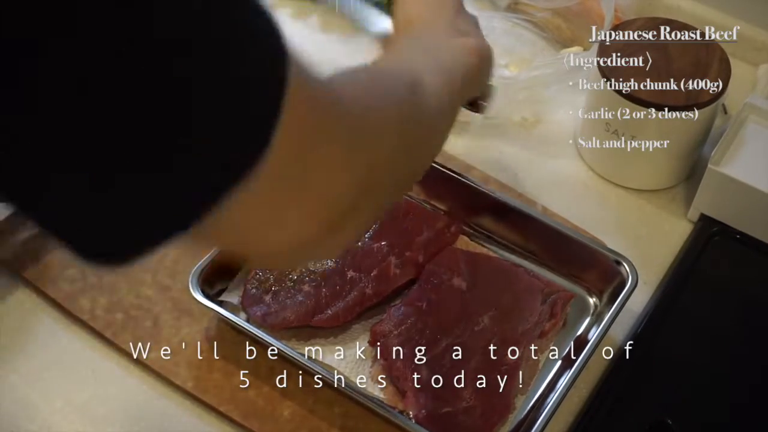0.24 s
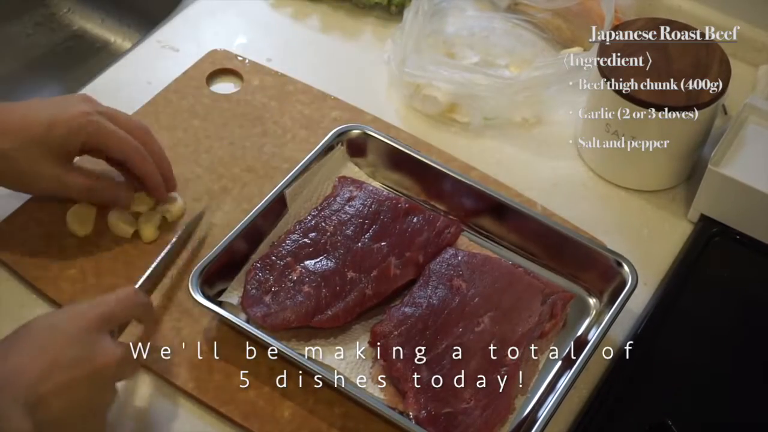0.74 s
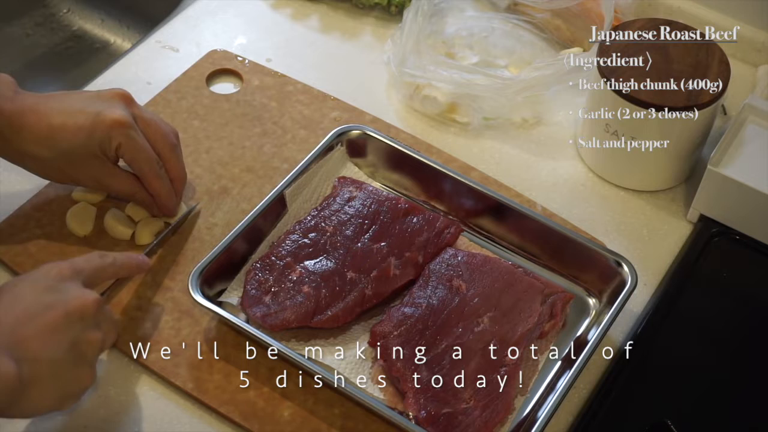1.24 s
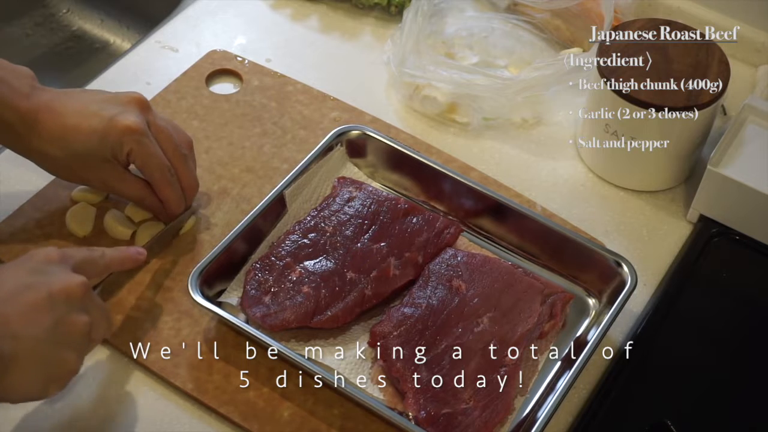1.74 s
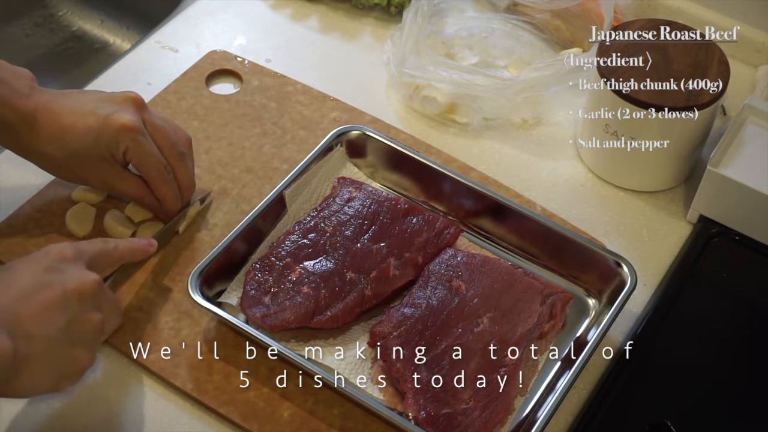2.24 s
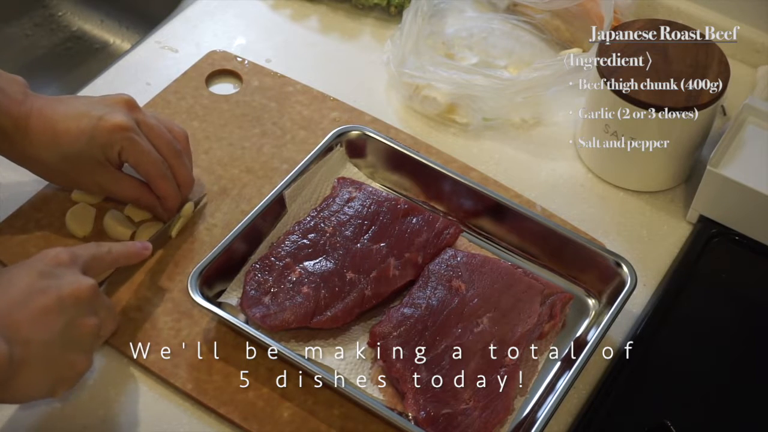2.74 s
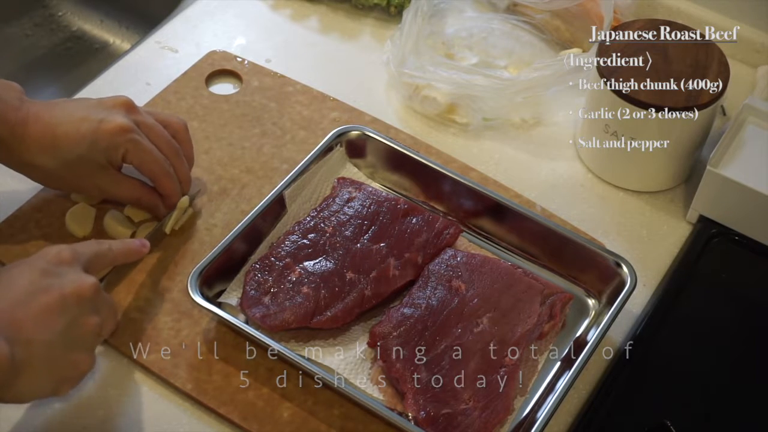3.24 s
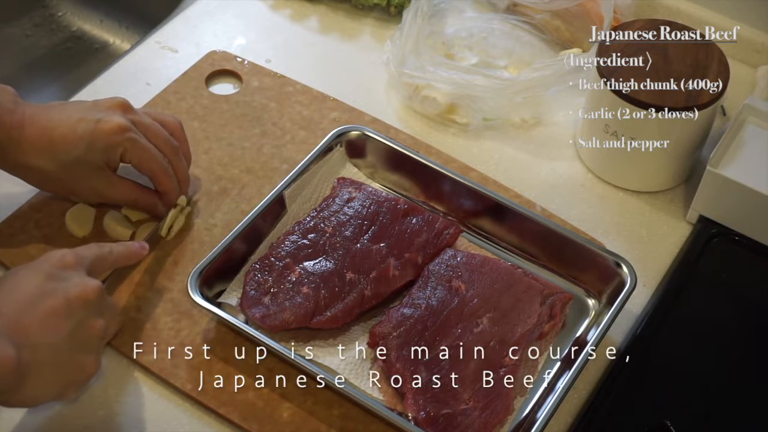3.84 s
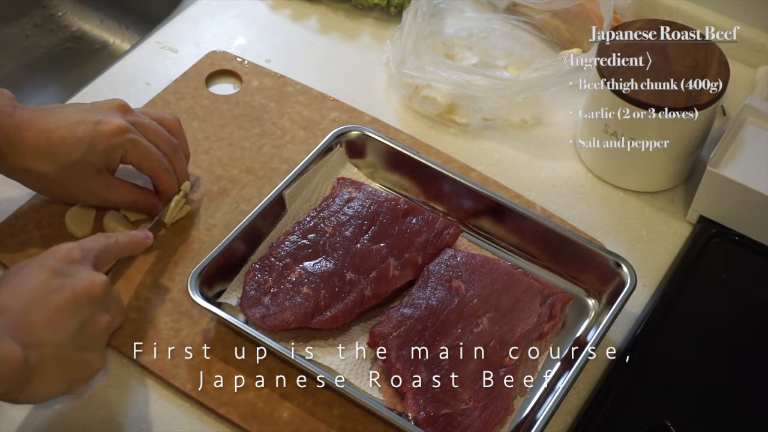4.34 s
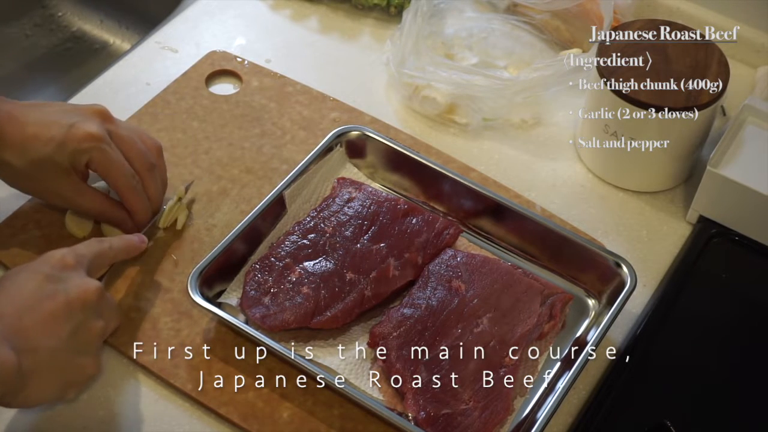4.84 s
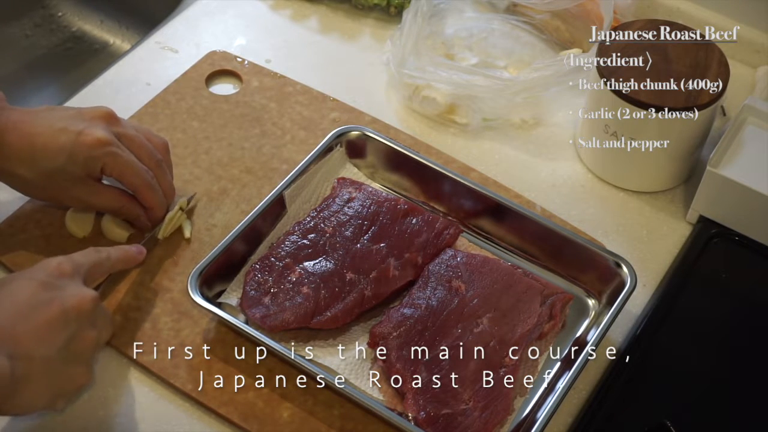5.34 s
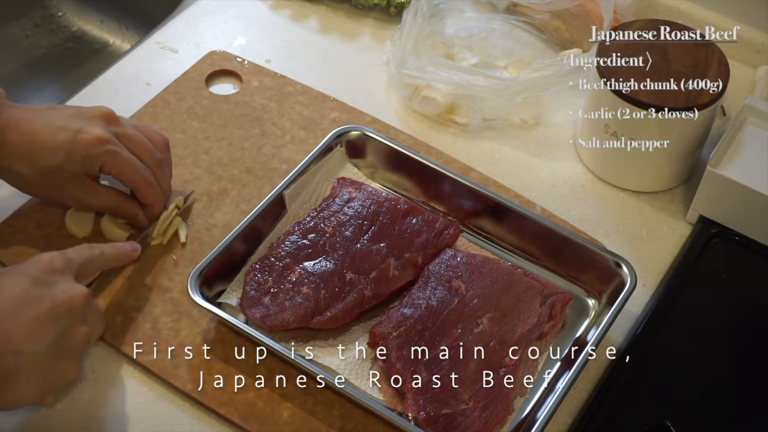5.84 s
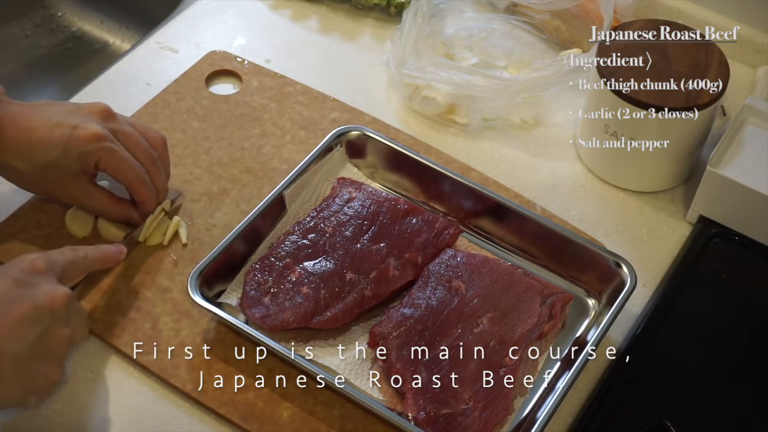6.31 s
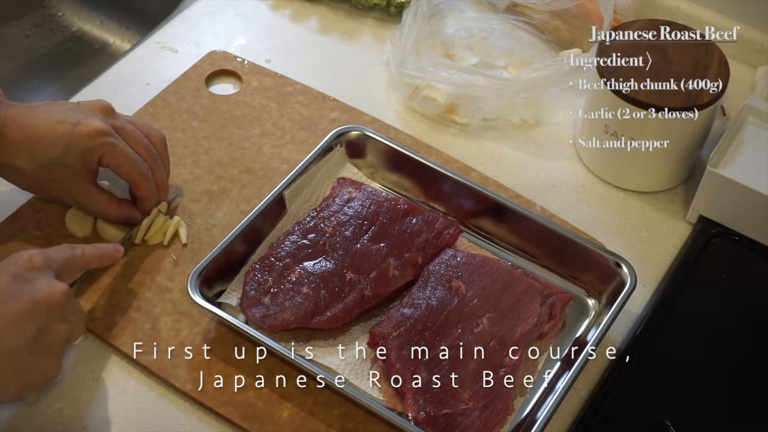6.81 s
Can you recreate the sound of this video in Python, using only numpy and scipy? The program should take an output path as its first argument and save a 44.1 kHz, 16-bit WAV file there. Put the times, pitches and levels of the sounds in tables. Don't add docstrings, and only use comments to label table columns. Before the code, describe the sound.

A quiet, bare kitchen with hard, short echo, heard in stereo from a step away. At 0 s there are dull handling bumps and low counter rumble; at 0.15 s the knife lifts with a thin steel clink, quickly damped. Faint rustling and a tiny tick come near 0.7 s, then a firm set-down knock at 0.9 s and a gritty, stuttering blade drag around 1.1 s, leaving a brief metallic singing. From 1.8 s, garlic is sliced: a tiny crisp crunch, then a dry woody knock, at 1.8, 2.2, 2.5 (soft), 2.7, 3.1, 3.35, 3.9 (faint), 4.2 and 4.5 s. A lull follows with light finger rustles and a small crunch at 5.3 s. Knocks resume at 5.6, 6.1, 6.35, 6.6 and 6.9 s. Between 6.37 and 6.6 s, a wet-blade squeak slides down and jumps lower. Soft rumble and room hum continue throughout.

```python
import sys
import numpy as np
from scipy import signal
from scipy.fft import rfft, irfft, next_fast_len
from scipy.io import wavfile
from scipy.ndimage import uniform_filter1d

SR = 44100
rng = np.random.default_rng(int(sys.argv[2]) if len(sys.argv) > 2 else 0)


def convert_level_to_amplitude(level_db):
    exponent = np.asarray(level_db, float) / 20
    return 10 ** exponent


def to_wav(sig):
    pcm = np.clip(np.atleast_2d(sig), -1, 1) * 32767
    pcm = np.round(pcm).astype(np.int16)
    wavfile.write(sys.argv[1], SR, pcm.T)


N = 311787

# centre in Hz, width in Hz, level in dB.
COUNTER_DIP = [(2036, 220, -10)]


def unit(x):
    return x / np.sqrt(np.mean(x ** 2) + 1e-20)


def along(points, hz):
    f, v = np.transpose(points)
    return np.interp(np.log(hz + 1), np.log(f + 1), v)


def stroke(rows):
    s, *cols = np.transpose(sorted(map(tuple, rows)))
    at = np.arange(max(round(s[0] * SR), 0), min(round(s[-1] * SR), N))
    return at, [np.interp(at / SR, s, c) for c in cols]


def swell(peak_s, db, rise_s, fall_s):
    start = (peak_s - 2 * rise_s, db - 40)
    end = (peak_s + 2 * fall_s, db - 40)
    at, (level_db,) = stroke([start, (peak_s, db), end])
    return at, convert_level_to_amplitude(level_db)


def filtered(x, response):
    m = next_fast_len(x.shape[-1] + 8192)
    return irfft(rfft(x, m) * response(np.fft.rfftfreq(m, 1 / SR)), m)[..., :x.shape[-1]]


def resonances(modes, f):
    total = 0
    for k, (centre, width, db) in enumerate(modes):
        damping = 1j * f * width
        total = total + (-1) ** k * convert_level_to_amplitude(db) * damping / (centre * centre - f * f + damping)
    return total


def ring(modes, f):
    return resonances([(hz, w, db + 1.6 * rng.standard_normal()) for hz, w, db in modes], f)


def grainy(spectrum, spike_db):
    sizes = np.repeat(convert_level_to_amplitude(spike_db * rng.standard_normal(N // 32 + 1)), 32)[:N]
    return unit(filtered(sizes * rng.standard_normal(N), lambda hz: convert_level_to_amplitude(along(spectrum, hz))))


def spread(pair):
    # frequency in Hz, side minus mid in dB.
    side_over_mid = [(60, -36), (110, -11), (200, -8.5), (380, -11), (700, -7.5), (1290, -5), (2380, -2.5),
                     (4400, 0), (8120, 1.5), (15000, 1)]

    def mid_side(hz):
        ratio = convert_level_to_amplitude(along(side_over_mid, hz))
        return np.array([1 + 0 * hz, ratio]) / np.hypot(1, ratio)

    mid, side = filtered(pair, mid_side)
    return np.array([mid + side, mid - side])


def kitchen(walls, t60, direct_db, early_db):
    # frequency in Hz, echo length as a ratio to that near 1 kHz.
    echo_ratio = [(200, 0.79), (1000, 0.96), (4000, 1.09), (8000, 0.96), (15000, 0.48)]
    noise = 0.88 * walls + 0.76 * rng.standard_normal(walls.shape)
    hz, t, z = signal.stft(noise, SR, nperseg=128)
    band_t60 = np.clip(t60, .1, 1.5) * along(echo_ratio, hz)[:, None]
    tail = signal.istft(z * convert_level_to_amplitude(-60 * t / band_t60), SR, nperseg=128)[1]
    t = np.arange(tail.shape[1]) / SR
    early = convert_level_to_amplitude(early_db - 60 * t / 0.018)
    tail = spread(tail * (1 + early) * np.clip(t / 0.000067, 0, 1))
    tail[:, 0] += convert_level_to_amplitude(direct_db)
    return tail


def room_tone():
    # frequency in Hz, level in dB per Hz.
    air_colour = [(12, -62), (20, -10), (75, -32), (108, -2.5), (147, -21.5), (230, -6), (297, -10.5),
                  (382, -7), (670, -19.5), (2010, -23), (2890, -26.5), (5210, -28), (5830, -28.5),
                  (15200, -26.5), (16500, -49)]
    air = filtered(spread(rng.standard_normal((2, N))), lambda hz: convert_level_to_amplitude(along(air_colour, hz)))
    return convert_level_to_amplitude(-52.5) * unit(air)


def counter_rumble():
    # peak in seconds, rumble level in dB.
    pushes = [(.03, -42), (.75, -70), (.94, -54), (1.26, -54.5), (1.63, -54.5), (1.89, -53), (2.13, -52.5),
              (2.24, -52), (2.5, -54), (2.75, -53), (2.97, -52), (3.09, -51.5), (3.31, -48.5), (3.419, -51),
              (3.62, -45), (3.78, -59), (3.93, -47), (4.21, -45), (4.51, -52.5), (4.61, -58), (5.36, -59),
              (5.56, -49.5), (5.68, -55), (5.81, -48.5), (6.08, -48), (6.4, -50.5), (6.58, -49),
              (6.72, -49), (6.92, -46)]
    # centre in Hz, width in Hz, level in dB.
    counter_modes = [(26.2, 5.1, 1), (58, 14.7, 2), (82.2, 14.6, 2.5), (149, 61, -3)]
    power = np.full(N, convert_level_to_amplitude(-67) ** 2)
    for s, db in pushes:
        at, gain = swell(s, db, rise_s=0.1, fall_s=0.17)
        power[at] += gain ** 2
    rumble = unit(filtered(rng.standard_normal(N), lambda hz: resonances(counter_modes, hz) ** 2))
    return convert_level_to_amplitude(4.0) * np.sqrt(power) * rumble


def clink():
    # frequency in Hz, level in dB, time to fall 60 dB in seconds.
    steel_modes = [(2480, -42, 0.25), (2564, -37.5, 0.1), (3408, -44.5, 0.57), (3740, -61, .1),
                   (4180, -46, 0.13), (4430, -56, .12), (5870, -49, .1), (7830, -50, 0.11),
                   (12300, -49, .1), (13560, -38, 0.17)]
    out, t = np.zeros(N), np.arange(SR // 2) / SR
    steel = sum(convert_level_to_amplitude(db - 60 * t / t60) * np.sin(2 * np.pi * hz * t) for hz, db, t60 in steel_modes)
    steel *= np.clip((.18 - t) / 0.053, 0, 1)
    scuff = convert_level_to_amplitude(-34.0 - 60 * t / 0.099) * rng.standard_normal(len(t))
    lift_s = .135
    out[round(lift_s * SR):][:len(t)] += steel + scuff
    return out


def drag():
    # time in seconds, scrape level in dB, steel singing over the scrape in dB.
    drag_path = [
        (0.93, -38, -21),
        (1.0, -30, -16),
        (1.09, -34, -23),
        (1.118, -14, -40),
        (1.148, -12, -36),
        (1.168, -37.5, -33),
        (1.215, -46.5, -5),
        (1.24, -54, -28),
    ]
    # frequency in Hz, level in dB per Hz.
    scrape_colour = [(59, -63), (100, -31), (140, -21), (317, -25), (425, -10.5), (502, -16), (558, -8),
                     (620, -8), (660, -7), (1370, -2.5), (1920, -9.5), (3320, -11.5), (4180, -26),
                     (15000, -54)]
    singing_modes = [(3420, 24, 9), (4240, 60, -2), (5500, 98, -5), (7700, 78, 4.0),
                     (10430, 530, -8.5), (12600, 900, -12), (15400, 300, -7)]
    out = np.zeros(N)
    at, (db, sing_db) = stroke(drag_path)
    stutter = grainy([(1000, 0)], spike_db=9.0)
    singing = unit(filtered(stutter, lambda f: resonances(singing_modes, f)))
    scrape = grainy(scrape_colour, spike_db=3.0)
    out[at] += convert_level_to_amplitude(db - 3.0) * scrape[at] + convert_level_to_amplitude(db + sing_db + 7.5) * singing[at]
    return out


def squeak():
    # time in seconds, pitch in Hz, level in dB.
    glide = [
        (6.37, 1315, -36),
        (6.395, 1305, -35),
        (6.45, 1272, -36),
        (6.478, 1239, -27.5),
        (6.49, 1232, -47),
        (6.524, 1216, -34),
        (6.53, 956, -32.5),
        (6.575, 935, -35.5),
        (6.6, 935, -49),
    ]
    out = np.zeros(N)
    at, (hz, db) = stroke(glide)
    flutter = rng.standard_normal(len(at))
    flutter = unit(uniform_filter1d(uniform_filter1d(flutter, size=150), size=150))
    wobble = 0.6 * np.roll(flutter, len(at) // 2)
    out[at] = convert_level_to_amplitude(db + 2.2 * flutter) * np.sin(2 * np.pi * np.cumsum(hz) / SR + wobble)
    return out


def bumps(walls):
    # start in seconds, peak in dB, bright part in dB, time for the echo to fall 60 dB in seconds.
    contacts = [
        (.004, -30.5, -6, 0.5),
        (.038, -31, -19, 0.13),
        (0.662, -51.5, 14.5, 0.38),
        (0.898, -12, -4.5, 0.25),
    ]
    # centre in Hz, width in Hz, level in dB.
    flat_modes = [(152, 37, -13), (390, 120, -11.5), (846, 160, 3), (1075, 180, 0), (1370, 144, 2.5),
                  (2000, 490, -2.5)]
    bright_modes = [(2420, 560, 0.5), (3330, 670, -4), (5000, 700, -13), (7560, 5500, -29)]
    out = np.zeros((2, N + SR))
    for s, db, bright_db, t60 in contacts:
        room = kitchen(walls, t60, direct_db=21.5, early_db=-2.5)
        knock = filtered(room, lambda f: ring(flat_modes, f) + convert_level_to_amplitude(bright_db) * ring(bright_modes, f))
        out[:, round(s * SR):][:, :knock.shape[1]] += convert_level_to_amplitude(db + 5.5) * knock
    return out[:, :N]


def clove_noises():
    # frequency in Hz, level in dB per Hz.
    fizz_colour = [(1500, -17.5), (4000, -2), (7000, -5), (11000, -1), (16000, -3)]
    crush_colour = [(150, -37.5), (250, -13), (291, -11), (396, -2), (488, -11.5), (889, 1.5), (1140, -4.5),
                    (1370, 0.5), (7000, -15), (9100, -10), (15400, -120)]
    return grainy(fizz_colour, spike_db=5), grainy(crush_colour, spike_db=1.5)


def rustles(fizz, crush):
    # peak in seconds, 20 dB rise in ms, 20 dB fall in ms, fizz in dB, crush over the fizz in dB.
    touches = [(0.001, 13, 139.5, -52, 13.5), (.664, 258, 173, -52, -1), (1.532, 24, 37, -57.5, 6.5),
               (2.05, -5, 120, -54, -3), (2.497, 9, 45, -48.5, 12.5), (2.639, 0, 14, -49.5, 4.5),
               (3.58, 4, 23, -55.5, 13), (3.64, 3, 50, -44, 11.5), (3.931, 11, 36, -54, 7.5),
               (4.59, 3, 20, -39.5, 8), (4.97, 72, 28, -59, 3), (5.134, 34, 67, -63, -10),
               (5.345, 1, 54.5, -55, 14.5), (5.791, 0, 33, -55, 15), (5.839, 4, 44, -42.5, 11),
               (6.908, 30, 161, -47, -2)]
    out = np.zeros(N)
    for s, rise_ms, fall_ms, db, crush_db in touches:
        at, gain = swell(s, db, rise_ms / 1000, fall_ms / 1000)
        out[at] += gain * (convert_level_to_amplitude(6.5) * fizz[at] + convert_level_to_amplitude(crush_db + 1.5) * crush[at])
    return out


def cuts(fizz, crush):
    # start in seconds, length in seconds, fizz at the bite in dB, fizz at the end in dB,
    # crush over the fizz in dB.
    slices = [(1.784, 0.049, -49, -41, 8), (2.144, 0.038, -51, -37, 9.5), (2.455, 0.038, -40.5, -40, 6.5),
              (3.017, 0.039, -39.5, -32, 4), (3.306, 0.035, -48.5, -66, 13.5),
              (3.333, .015, -35.5, -31.5, 9.5), (3.617, 0.022, -41.5, -41, 9.5),
              (3.885, 0.041, -45, -42.5, 9), (4.167, .033, -48.5, -56, 12.5),
              (4.199, 0.03, -38.5, -36.5, 7), (4.452, 0.012, -44.5, -44, 12.5),
              (5.307, 0.041, -57.5, -50, 11.5), (5.531, .057, -48.5, -39, 10.5),
              (5.821, .016, -41.5, -32.5, 4), (6.043, 0.03, -41.5, -47, 5), (6.066, 0.039, -41.5, -35.5, 2),
              (6.318, 0.057, -38, -41.5, 10), (6.525, 0.056, -51, -38.5, 15.5),
              (6.838, 0.036, -41.5, -45, 14)]
    sag_at, sag_db, crush_fades_db = 0.42, 5.5, 6
    out = np.zeros(N)
    for s, length, bite_db, end_db, crush_db in slices:
        middle_db = bite_db + sag_at * (end_db - bite_db) - sag_db
        bite, end = (s, bite_db, .5), (s + length, end_db, -.5)
        at, (db, fade) = stroke([bite, (s + sag_at * length, middle_db, .5), end])
        out[at] += convert_level_to_amplitude(db + 5.5) * fizz[at]
        out[at] += convert_level_to_amplitude(db + crush_db + crush_fades_db * fade - 2.5) * crush[at]
    return out


def chops(walls):
    # start in seconds, peak in dB, low knock in dB, edge click in dB, time for the echo to fall 60 dB in
    # seconds.
    blows = [(1.8384, -20.5, -2.5, -20.5, 0.51), (2.1869, -13, -8.5, -16.5, 0.5166),
             (2.4929, -31.5, -0.5, -11, 0.2058), (2.7148, -12.5, -10, -27.5, 0.4727),
             (3.0574, -20, -6, -2.5, 0.48), (3.3483, -11, -8.5, -22, 0.4766), (3.926, -34, -2, -6.5, 0.43),
             (4.2243, -18.5, -4, -27, 0.3883), (4.4666, -11, -10.5, -19, 0.5324),
             (5.5901, -14.5, -8.5, -23.5, 0.5749), (6.105, -16, -8, -16.5, 0.7145),
             (6.357, -15.5, -3, -19, 0.3569), (6.5876, -12, -10.5, -22.5, 0.6236),
             (6.8689, -13.5, -6, -21, 0.4056)]
    # centre in Hz, width in Hz, level in dB.
    low_modes = [(374, 39, -7.5), (636, 149, -4.5), (816, 124, -1.5), (889, 69, 3), (965, 26.3, 1),
                 (1068, 99, 6.5), (1202, 200, -1), (1324, 120, -0.5), (1482, 89, 0)]
    tock_mode = [(977, 325, -2.5)]
    middle_modes = [(2180, 275, -5.5), (2540, 148, -1.5), (2930, 264, -3), (3330, 234, -1.5),
                    (3565, 334, -8)]
    upper_mode = [(3910, 620, 0.0058)]
    edge_modes = [(5430, 990, 1.5), (7080, 5300, 5), (7040, 370, -32.5)]
    glint_mode = [(9700, 1900, -1.5)]
    # centre in Hz, width in Hz, cancelling copy in dB.
    board_gap = [(1850, 470, -8)]
    dull_hz = 8000
    out, t = np.zeros((2, N + SR)), np.arange(SR // 50) / SR
    for s, db, low_db, edge_db, t60 in blows:
        upper_db = -16.5 + 56.5 * (t60 - 0.5)

        def struck(f):
            board = convert_level_to_amplitude(low_db + 5.5) * (ring(low_modes, f) + ring(tock_mode, f))
            board = board - ring(middle_modes, f) - convert_level_to_amplitude(upper_db) * ring(upper_mode, f)
            board = board - convert_level_to_amplitude(edge_db - 3.5) * ring(edge_modes, f)
            glint = convert_level_to_amplitude(1.58 * edge_db - 2.5) * ring(glint_mode, f)
            notches = (1 - resonances(COUNTER_DIP, f)) * (1 - resonances(board_gap, f))
            return (board / (1 + 1j * f / dull_hz) ** 2 + glint) * notches

        knock = filtered(kitchen(walls, t60, direct_db=20.0, early_db=5.5), struck)
        crack = np.diff(rng.standard_normal((2, len(t) + 1)))
        knock[:, :len(t)] += crack * convert_level_to_amplitude(edge_db - 31 - 60 * t / 0.0043)
        out[:, round(s * SR):][:, :knock.shape[1]] += convert_level_to_amplitude(db + 7) * knock
    return out[:, :N]


def scene():
    walls = rng.standard_normal((2, SR * 3 // 5))
    room = kitchen(walls, 0.41, direct_db=29.5, early_db=10)
    room = filtered(room / np.linalg.norm(room[0]), lambda f: 1 - resonances(COUNTER_DIP, f))
    background = room_tone() + counter_rumble()
    tone = squeak()
    fizz, crush = clove_noises()
    rubbing = clink() + drag() + 0.47 * tone + rustles(fizz, crush) + cuts(fizz, crush)
    rubbing = signal.fftconvolve(rubbing[None], room, axes=1)[:, :N]
    knocks = bumps(walls) + chops(walls)
    slow = 1 / (.12 * SR)
    loudness = signal.lfilter([slow], [1, slow - 1], np.abs(knocks).mean(axis=0))
    return knocks + 0.61 * tone + (rubbing + background) / (1 + loudness / convert_level_to_amplitude(-15.5))


def roll_off(x):
    return signal.sosfilt(signal.butter(12, 16660, fs=SR, output="sos"), x)


def record(dry):
    # frequency in Hz, left minus right in dB.
    capsule_lean = [(60, 0.0), (110, -1), (200, -0.5), (380, -0.5), (700, -0.5), (1290, -0.5), (2380, -1),
                    (4400, 0.5), (8120, 0), (15000, -1)]
    top_hz = 15900
    halves = np.array([[.5], [-.5]])
    x = filtered(dry, lambda hz: convert_level_to_amplitude(along(capsule_lean, hz) * halves) * (hz < top_hz))
    x = x / (1 + np.abs(x / .62) ** 4) ** (1 / 4)
    return roll_off(x)


dry = scene()
out = record(dry)
to_wav(out)
```